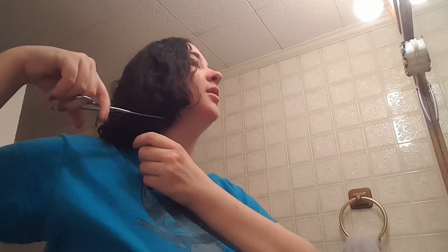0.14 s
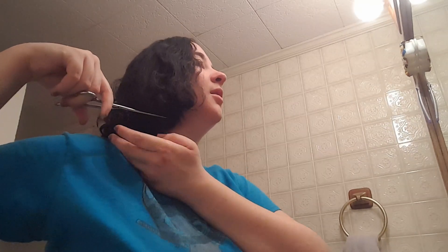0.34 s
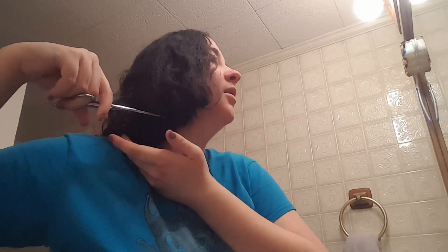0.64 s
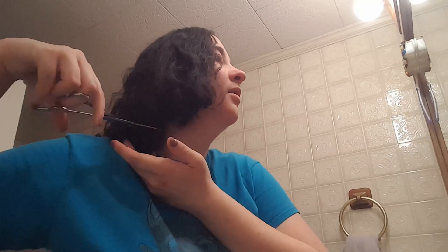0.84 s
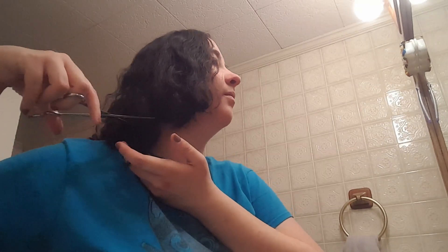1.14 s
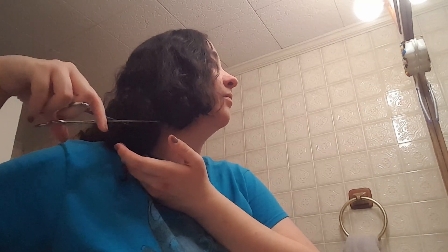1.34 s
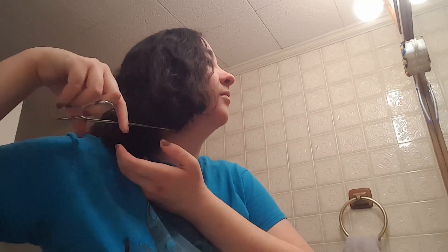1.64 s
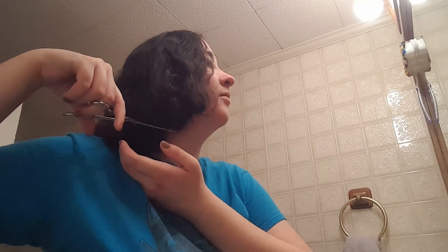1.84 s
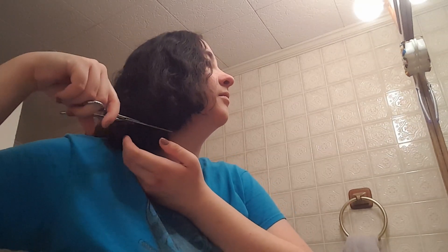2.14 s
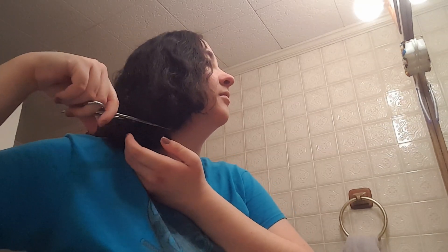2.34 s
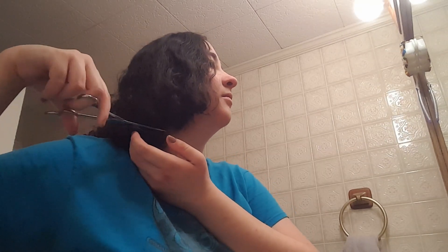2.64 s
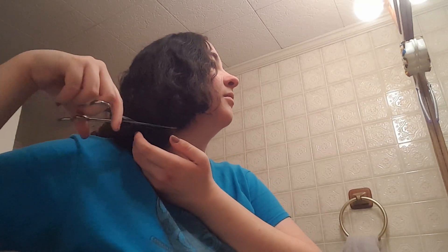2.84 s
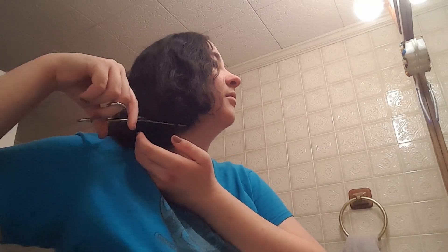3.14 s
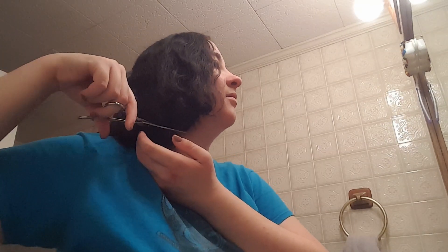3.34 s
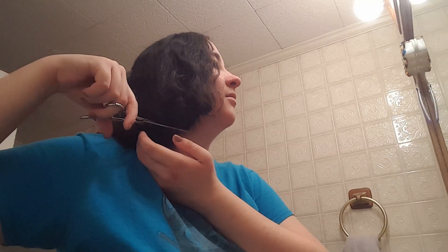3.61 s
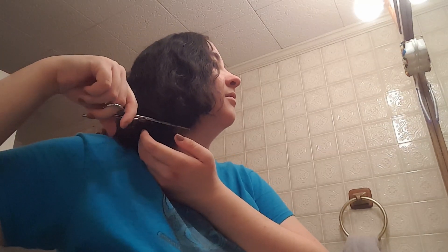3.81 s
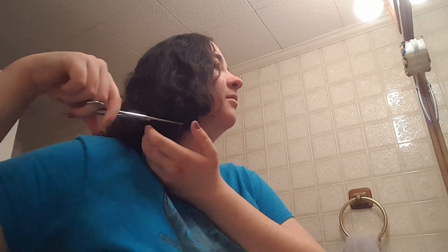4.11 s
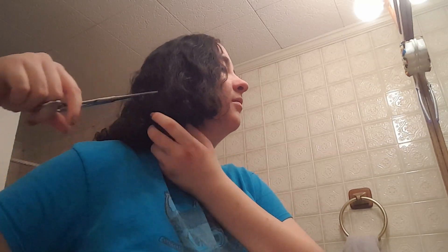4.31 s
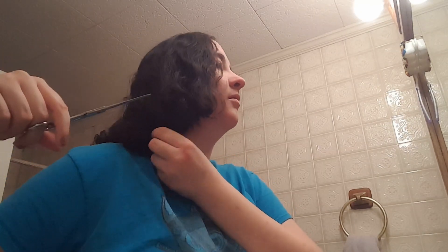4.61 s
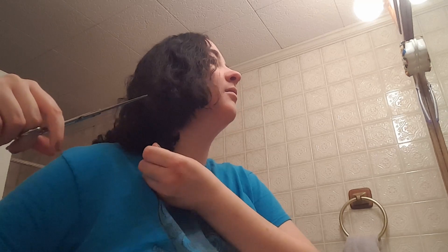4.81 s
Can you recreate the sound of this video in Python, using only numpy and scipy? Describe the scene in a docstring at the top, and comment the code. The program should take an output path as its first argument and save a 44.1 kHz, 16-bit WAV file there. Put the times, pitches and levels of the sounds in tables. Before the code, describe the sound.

A quiet, small tiled bathroom with low mains hum, soft rumble and faint hiss. From about 0.1 s scissors press lightly into thick hair; dry crackles thicken from 0.35 s into a crunchy run of giving strands, with a thin falling squeak, until a sharp steel snap at 0.65 s. The blades scrape softly open around 0.83-0.9 s with a small pivot click. After near quiet, a second squeeze starts at 1.8 s, crunching harder from 2.1 s and ending in the loudest, bright snap at 2.3 s. A faint opening scrape follows near 2.6 s. Very light blade rubs come at 3.3 s, then a brief crackle from 3.63 s and a weaker, thinner snap at 3.82 s. Fingers rustle softly through hair at about 4.3 and 4.65 s. Short, dense tile reflections surround the close scissors in stereo, arriving slightly earlier on the right.

```python
"""Crunching hair and three sharp steel snaps in a small tiled bathroom, over mains hum and faint hiss.
Clicks of severed strands ring the scissor blades; a snap is a chattering blow plus steel modes.
Thin whistles glide along the edges, the blades scrape softly open, and fingers brush the hair at the end.
A two-port microphone hears the walls about as strongly as the scissors, and the right port hears them first."""
import sys
import numpy as np
from scipy import signal
from scipy.fft import rfft, irfft
from scipy.io import wavfile
from scipy.ndimage import uniform_filter1d

SR = 44100
rng = np.random.default_rng(int(sys.argv[2]) if len(sys.argv) > 2 else 0)


def master_out(mix):
    """Clip the mix to full scale and print it as 16-bit PCM to the path in sys.argv[1]."""
    frames = np.transpose(np.atleast_2d(mix))
    ceiling = np.clip(frames, -1, 1)
    pcm = np.round(ceiling * 32767).astype(np.int16)
    wavfile.write(sys.argv[1], SR, pcm)


N = 219088  # length in samples
TIME = np.arange(N) / SR  # s
FREQS = np.fft.rfftfreq(N, 1 / SR)  # Hz


def amp(db):
    """Decibels to gain."""
    return 10 ** (np.asarray(db) / 20)


def unit(x):
    """Scales to an rms of 1."""
    return x / np.sqrt(np.mean(x ** 2) + 1e-30)


def read(points, hz):
    """Reads a table on a log-frequency axis."""
    f, value = np.transpose(points)
    return np.interp(np.log(hz + 1), np.log(f + 1), value)


def humps(modes):
    """Gain over frequency of a set of resonances, their powers added."""
    power = sum(amp(db) ** 2 / (1 + ((FREQS - hz) / width) ** 2) ** 2 for hz, width, db in modes)
    return np.sqrt(power)


def colour(x, gain):
    """Minimum-phase filter of the given shape that keeps the power of white noise."""
    log_gain = np.log(np.maximum(unit(gain), 1e-5))
    circle = np.concatenate([log_gain, log_gain[-2:0:-1]])
    response = np.exp(np.conj(signal.hilbert(circle)))[:len(gain)]
    return irfft(rfft(x) * response, N)


def wander(rate_hz):
    """Smooth random curve, rms 1."""
    return unit(irfft(rfft(rng.standard_normal(N)) * np.exp(-(FREQS / rate_hz) ** 2), N))


def grains(per_s, spread_db):
    """Random tiny clicks of uneven size and either sign, rms 1."""
    size = amp(spread_db * np.minimum(rng.exponential(1, N), 3))
    sign = rng.choice([-1, 1], N)
    return unit(size * sign * (rng.random(N) < per_s / SR))


def bursts(rows, decay_s, rise_s=0.00076):
    """Gain over time of sudden slips that die away, their powers added."""
    power = np.zeros(N)
    for s, db in rows:
        age = np.maximum(TIME - s, 0)
        power += (amp(db) * (1 - np.exp(-age / rise_s)) * np.exp(-age / decay_s)) ** 2
    return np.sqrt(power)


def approach(rows, build_s):
    """A share that grows to 1 as each event draws near and drops when it happens."""
    return np.max([np.exp(-abs(TIME - s) / build_s) * (TIME < s) for s, *_ in rows], axis=0)


def chatter(contact):
    """Random tiny pulses under a short envelope, with their energy spread evenly over frequency."""
    x = contact * rng.standard_normal(len(contact))
    for _ in range(3):  # flatten the spectrum, then reshape in time
        x = np.sqrt(contact) * irfft(np.exp(1j * np.angle(rfft(x))), len(x))
    return unit(x) * np.sqrt(np.mean(contact ** 2))


def placed(s, sound):
    """A short sound set at its moment on a silent track."""
    return np.concatenate([np.zeros(round(s * SR)), sound, np.zeros(N)])[:N]


# colour of the room hiss: freq_hz [Hz], relative_level_db [dB]
AIR_COLOUR = [(60, -18), (150, -8), (270, -6.5), (340, -6), (460, -7), (700, -11), (1100, -12.5),
              (2000, -15), (4300, -19), (7500, -24.5), (10200, -31), (12500, -24.5), (15500, -32.5)]
# share of the hiss common to both microphone ports: freq_hz [Hz], share [0-1]
SHARED_HISS = [(150, 0.05), (300, 0.5), (600, 0.2), (2000, 0.3), (15000, 0)]
# colour of the low rumble: freq_hz [Hz], relative_level_db [dB]
RUMBLE_COLOUR = [(20, -15.5), (45, -4), (90, -1), (160, -1.5), (260, -12.5), (500, -26.5)]
# steady tones of the mains hum, lowest first: freq_hz [Hz], level_db [dB]
MAINS_HUM = [(60, -75.5), (120, -63.5), (180, -83), (240, -83.5), (260, -81), (360, -83.5), (452, -83),
             (480, -84.5)]
# the lowest hum swells slowly: period [s], a crest [s], rise and fall about its level [dB]
HUM_SWELL_S, HUM_SWELL_AT_S, HUM_SWELL_DB = 1.5, 0.95, 5


def room_tone(air_db=-66, rumble_db=-73, apart=0.71, waver=.14):
    """Hiss and rumble partly shared by the ports, and a slightly wavering mains hum common to both."""
    noise = rfft(rng.standard_normal((3, N)))
    same = np.clip(read(SHARED_HISS, FREQS), 0, 1)
    hiss = irfft(np.sqrt(1 - same) * noise[:2] + np.sqrt(same) * noise[2], N)
    air = colour(hiss, amp(read(AIR_COLOUR, FREQS)))
    low_noise = rng.standard_normal(N) + apart * rng.standard_normal((2, N))
    rumble = colour(low_noise, amp(read(RUMBLE_COLOUR, FREQS)))
    tones = []
    for hz, db in MAINS_HUM:
        level = np.sqrt(2) * amp(db) * (1 + waver * wander(rate_hz=7))
        tones.append(level * np.sin(2 * np.pi * (hz * TIME + rng.random())))
    swell_db = HUM_SWELL_DB * np.cos(2 * np.pi * (TIME - HUM_SWELL_AT_S) / HUM_SWELL_S)
    hum = tones[0] * amp(swell_db) + sum(tones[1:])
    return amp(air_db) * air + amp(rumble_db) * rumble + hum


# a squeeze builds from a light touch to the full bite, then eases as the lock thins
TOUCH_DB, EASE_DB_PER_S = -22, -6


def squeeze(start, bite, end, db):
    """Gain over time of one squeeze: it builds to the bite, holds while easing, and stops."""
    build_db = TOUCH_DB * np.clip((bite - TIME) / (bite - start), 0, 1)
    ease_db = EASE_DB_PER_S * np.clip(TIME - bite, 0, 1)
    gain = amp(db + build_db + ease_db) * (TIME > start) * (TIME < end)
    return uniform_filter1d(gain, size=180)  # soften the ends over 4 ms


# squeezes of the handles: start_s [s], full_bite_s [s], end_s [s], relative_level_db [dB],
# crackle_vs_blades_db [dB], the hair between the edges as crackle against blade resonance
SQUEEZES = [(0.06, 0.164, 0.352, -59.5, -6), (0.34, 0.372, 0.73, -49.5, 7.5),
            (1.8, 2.0, 2.396, -48.5, -0.5), (3.63, 3.66, 3.712, -54.5, -7),
            (3.762, 3.802, 3.802, -40.5, -26)]
# bundles of strands giving way: start_s [s], relative_level_db [dB]
BUNDLES = [(0.1622, -57), (0.2355, -50), (0.3545, -51), (0.3695, -45), (0.454, -49), (0.4705, -46),
           (0.528, -42.5), (0.5585, -43.5), (0.585, -40), (0.6115, -41.5), (1.986, -46), (2.085, -47.5),
           (2.121, -42), (2.1675, -42), (2.235, -38.5), (2.2645, -38.5), (3.65, -50.5), (3.701, -46),
           (3.7565, -54), (3.773, -47.5)]
# broad crackle of the strands: freq_hz [Hz], relative_level_db [dB]
STRAND_CRACKLE = [(150, -20.5), (500, -11), (1500, -18.5), (2200, -11.5), (4300, -10), (5800, -7.5),
                  (8000, -7), (10600, -17.5), (12500, -8), (16000, -17.5)]
# resonances of the blades loaded with hair: freq_hz [Hz], width_hz [Hz], relative_level_db [dB]
LOADED_BLADES = [(1077, 89, -7.5), (2554, 270, 0), (3529, 160, 3), (5800, 140, -11), (6250, 270, -8),
                 (7770, 130, -10), (8400, 440, -6.5), (11840, 310, -9), (14340, 900, -6.5),
                 (14870, 330, -7.5)]
# blade resonances that grow towards the tips: freq_hz [Hz], width_hz [Hz], relative_level_db [dB]
TIP_MODES = [(3460, 130, 0), (5950, 260, -4)]
TIP_S = .05  # they build at this time constant before the snap
CRUNCH_S = 0.0057  # decay time constant of a bundle
STALL_DB, STALL_S = -7, .016  # the edges stall against a bundle just before it gives way


def cutting(shear_db=-4, crunch_db=1, slip_hz=110, tip_db=-7):
    """Severed strands click, heard as dry crackle and through the blades; the edges stick and slip."""
    slipping = amp(2.8 * wander(slip_hz)) * grains(per_s=1900, spread_db=4)
    stall_db = STALL_DB * approach(BUNDLES, STALL_S)
    pressure = sum(squeeze(start, bite, end, db) for start, bite, end, db, hair_db in SQUEEZES)
    shear = amp(shear_db + stall_db) * pressure * slipping
    crunches = bursts(BUNDLES, CRUNCH_S) * grains(per_s=9200, spread_db=8.0)
    clicks = shear + amp(crunch_db) * crunches
    start, bite, end, db, hair_db = np.transpose(SQUEEZES)
    load = amp(np.interp(TIME, bite, hair_db))
    crackle = colour(clicks, amp(read(STRAND_CRACKLE, FREQS)))
    blades = colour(clicks, humps(LOADED_BLADES))
    tips = amp(tip_db) * colour(clicks * approach(BLADE_SNAPS, TIP_S), humps(TIP_MODES))
    return (load * crackle + blades) / (1 + load) + tips


# edge squeaking on edge: start_s [s], length_s [s], start_pitch_hz [Hz], glide_hz_per_s [Hz/s],
# relative_level_db [dB]
EDGE_SQUEAKS = [(0.363, .12, 12600, -8500, -59), (2.106, .145, 12650, -8000, -56),
                (2.288, 0.014, 11270, 229999, -26), (3.335, 0.12, 11700, 16000, -74.5),
                (3.76, 0.048, 12500, 20000, -63)]


def squeaks(squeak_db=-4):
    """A thin, broken whistle that glides as the crossing point moves along the edges."""
    out = np.zeros(N)
    for start, length, hz, glide, db in EDGE_SQUEAKS:
        age = np.clip(TIME - start, 0, length)
        fuzz = wander(rate_hz=380) + 1j * wander(rate_hz=380)
        turn = np.exp(2j * np.pi * np.cumsum(hz + glide * age) / SR)
        whistle = unit((fuzz * turn).real)
        out += amp(db) * np.sqrt(abs(np.sin(np.pi * age / length))) * whistle
    return amp(squeak_db + 3 * wander(rate_hz=90)) * out


# blades snapping shut: start_s [s], level_db [dB], treble_tilt_db_per_octave [dB/octave],
# blow_pitch_factor [ratio], contact_band_hz [Hz], knock_db [dB], ring_db [dB], run_in_db [dB],
# run_in_s [s]; the last three levels are relative to the snap
BLADE_SNAPS = [(0.6493, -14.5, -1.5, 1.01, 6150, -29, -6, -20.5, 0.01),
               (2.2974, -9.5, -1, 1.02, 4750, -22, -6.5, -16, 0.0048),
               (3.818, -19.5, 0.6, 0.945, 5900, -28, -10, -16.5, 0.0087)]
# colour of the steel-on-steel blow: freq_hz [Hz], relative_level_db [dB]
BLOW_COLOUR = [(100, -36.5), (1300, -21), (1900, -7.5), (2550, 11.5), (3300, -8.5), (4600, -2),
               (5400, -5.5), (6400, 0), (7800, -3.5), (10500, 2), (12200, -1.5), (14500, 3.5),
               (16000, -3.5)]
# modes of the closed scissors: freq_hz [Hz], relative_level_db [dB], t60_s [s]
CLOSED_MODES = [(2207, -12, .1), (2360, -11, .06), (2525, -5, .09), (2700, -3, .07), (2862, -13, .06),
                (4620, -14, .09), (5940, -12, .09), (6428, -11, .08), (9200, -12, .08), (10530, -14, .08),
                (11440, -12, .08), (13215, -15, .08), (14000, -16, .08)]
# colour of the handle knock: freq_hz [Hz], relative_level_db [dB]
HANDLE_COLOUR = [(40, -10.5), (130, 2), (350, 0), (700, -7), (1100, 3), (2200, -3), (5000, -27.5)]


def snaps(chatter_s=0.0012, chatter_width=0.00066, ring_db=-15, ring_rise=0.0005, settle_db=-12,
          settle_s=0.0016):
    """Blades rush through the last strands, chatter together and ring; the handles knock dully."""
    steel, knock = np.zeros(N), np.zeros(N)
    t = np.arange(SR // 4) / SR
    clash = np.exp(-.5 * ((t - chatter_s) / chatter_width) ** 2)
    contact = clash + amp(settle_db) * np.exp(-t / settle_s)
    blades = np.hypot(humps(LOADED_BLADES), amp(read(STRAND_CRACKLE, FREQS)))
    for s, db, tilt_db, pitch, spot_hz, knock_db, steel_db, run_db, run_s in BLADE_SNAPS:
        force = placed(s, chatter(contact))
        # where the edges meet favours one band
        spot_db = 5 * np.exp(-.5 * ((FREQS - spot_hz) / 380) ** 2)
        slope_db = tilt_db * np.log2((FREQS + 500) / 6000)
        blow = colour(force, amp(read(BLOW_COLOUR, FREQS / pitch) + spot_db + slope_db))
        ring = np.zeros(len(t))
        for hz, mode_db, t60 in CLOSED_MODES:
            ring += amp(mode_db - 60 * t / t60) * np.sin(2 * np.pi * (hz * t + rng.random()))
        ring = placed(s, ring * (1 - np.exp(-t / ring_rise)))
        rush = np.exp(-abs(TIME - s) / run_s) * (TIME < s)
        run_in = colour(grains(per_s=9000, spread_db=-1.0) * rush, blades)
        steel += amp(db) * (blow + amp(ring_db + steel_db) * ring + amp(run_db) * run_in)
        knock += amp(db + knock_db) * force
    return steel, colour(knock, amp(read(HANDLE_COLOUR, FREQS)))


RUB_EDGE_S, RUB_FADE_DB = 0.0039, -4.5  # a rub starts and stops quickly and weakens along the way


def rub(start, length, db):
    """Gain over time of steel sliding on steel: quick attack, fading hold, quick release."""
    age = TIME - start
    fade_db = RUB_FADE_DB * np.clip(age / length, 0, 1)
    return amp(db + fade_db) * np.clip(np.minimum(age, length - age) / RUB_EDGE_S, 0, 1)


# blades rubbing as they open: start_s [s], length_s [s], relative_level_db [dB]
OPENING_RUBS = [(0.826, 0.084, -60), (2.608, 0.081, -60.5), (3.299, 0.12, -71), (3.334, 0.017, -62.5),
                (3.379, .022, -65)]
# resonances of the free blades: freq_hz [Hz], width_hz [Hz], relative_level_db [dB]
FREE_BLADES = [(985, 74, 6), (2620, 116, 9), (3400, 110, -1), (6100, 190, 5), (8000, 440, -8.5),
               (12000, 560, -8), (14700, 950, -11)]
# the pivot catches as it opens: start_s [s], level_db [dB]
PIVOT_CATCHES = [(0.892, -49.5), (2.657, -61), (2.684, -56.5)]
# resonances of the pivot: freq_hz [Hz], width_hz [Hz], relative_level_db [dB]
PIVOT_MODES = [(5620, 260, 0), (8150, 400, -4), (9650, 250, -10), (11700, 400, -10), (14900, 900, -9)]
CATCH_S = 0.0057  # decay time constant of a catch


def opening(rub_db=-3, hiss_db=-19, slip_hz=100):
    """The empty blades judder apart, sounding their free resonances, and the pivot catches."""
    judder = amp(2 * wander(slip_hz)) * grains(per_s=4000, spread_db=4)
    stroke = amp(rub_db) * sum(rub(*row) for row in OPENING_RUBS)
    scrape = colour(stroke * judder, humps(FREE_BLADES) + amp(hiss_db))
    catches = bursts(PIVOT_CATCHES, CATCH_S) * rng.standard_normal(N)
    return scrape + colour(catches, humps(PIVOT_MODES))


# fingers brushing through hair: fastest_s [s], relative_level_db [dB]
BRUSH_PASSES = [(4.31, -63), (4.665, -65)]
# colour of the rustling hair: freq_hz [Hz], relative_level_db [dB]
HAIR_COLOUR = [(150, -11), (450, 6.5), (800, -5.5), (1800, -9.5), (3100, 0), (5000, -5.5), (6500, -2),
               (10500, -11.5), (13000, -7), (16000, -14)]
BRUSH_RISE_S, BRUSH_FALL_S = 0.05, 0.096  # each pass swells and dies away more slowly


def brushing(brush_db=-3):
    """Soft, dense rustle of hair under the fingers, made of crowded tiny clicks."""
    passes = np.zeros(N)
    for s, db in BRUSH_PASSES:
        spread_s = np.where(TIME < s, BRUSH_RISE_S, BRUSH_FALL_S)
        passes += amp(db) * np.exp(-.5 * ((TIME - s) / spread_s) ** 2)
    rustle = passes * grains(per_s=13000, spread_db=5.5)
    return amp(brush_db) * colour(rustle, amp(read(HAIR_COLOUR, FREQS)))


# reverberation of the tiled walls: freq_hz [Hz], t60_s [s]
TILE_DECAY = [(150, 0.32), (600, 0.25), (2500, .22), (6000, 0.22), (11000, 0.17), (16000, 0.15)]


def bathroom(x, wet_db, early_db, early_s=0.0085, gap_s=0.00066):
    """Direct sound, a quick scatter from near surfaces and the tail of the tiled walls."""
    t = np.arange(SR // 2) / SR
    signs = rng.choice([-1., 1.], (2, len(t)))
    taps = signs * (rng.random((2, len(t))) < 7000 / SR) * (t > gap_s)
    hz, frames, z = signal.stft(taps, SR, nperseg=128)
    decay = amp(-60 * frames / read(TILE_DECAY, hz)[:, None])
    tail = signal.istft(z * decay, SR, nperseg=128)[1][:, :len(t)]
    early = np.array([chatter(np.exp(-t / early_s)) for port in range(2)])
    echo = (amp(wet_db) * unit(tail) + amp(early_db) * unit(early)) / np.sqrt(len(t))
    return x + signal.fftconvolve(x[None], echo, axes=1)[:, :N]


# left microphone port against the right: freq_hz [Hz], level_db [dB]
LEFT_LEAN = [(300, 6), (1200, -2.5), (2500, -0.5), (4000, 3), (7000, 3), (10000, -2), (15000, -2)]
# left microphone port behind the right: freq_hz [Hz], lag_rad [rad]
LEFT_LAG = [(20, 0.18), (800, 2.5), (2500, 0.65), (4000, 1.8), (7000, 2), (15000, 1.5)]


def scene():
    """Scissors and hair in the room; the sound reaches the right port first."""
    cut = cutting() + squeaks()
    steel, knock = snaps()
    near = bathroom(cut + opening() + brushing(), wet_db=-2, early_db=-1.5)
    near += bathroom(steel, wet_db=-3, early_db=-2.5)
    near += bathroom(knock, wet_db=-2.5, early_db=-1.5)
    # each port takes half of the level and phase difference
    port = amp(read(LEFT_LEAN, FREQS) / 2) * np.exp(-.5j * read(LEFT_LAG, FREQS))
    return irfft(rfft(near) * [port, 1 / port], N) + room_tone()


EDGE_HZ = 15900  # top of the recorder's band


def record(dry):
    """The recorder's band limit, a steep linear-phase low-pass."""
    low_pass = signal.firwin(301, EDGE_HZ, window=("kaiser", 8), fs=SR)
    return signal.oaconvolve(dry, low_pass[None], "same")


dry = scene()
out = record(dry)
master_out(out)
```